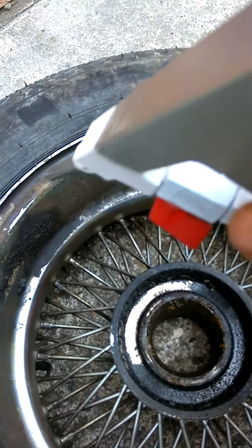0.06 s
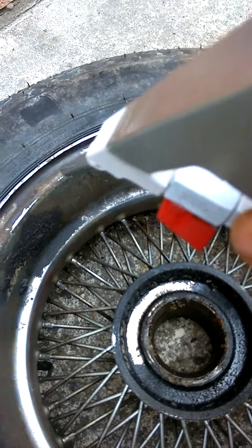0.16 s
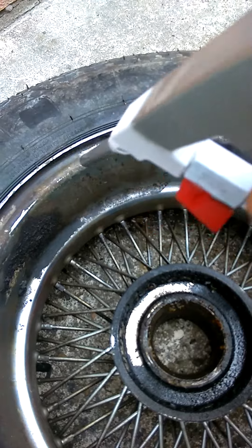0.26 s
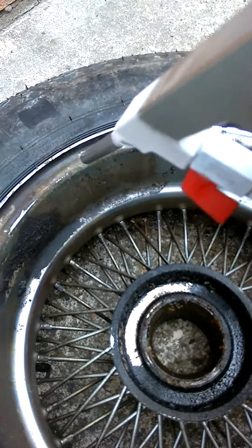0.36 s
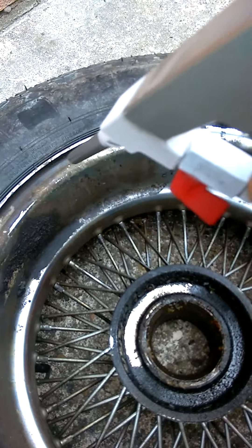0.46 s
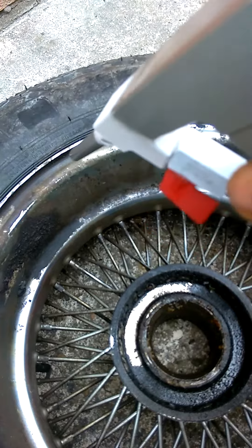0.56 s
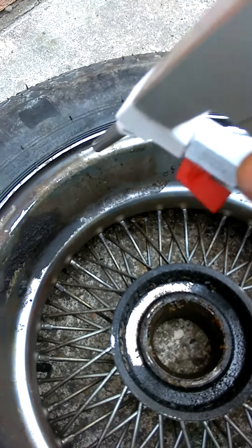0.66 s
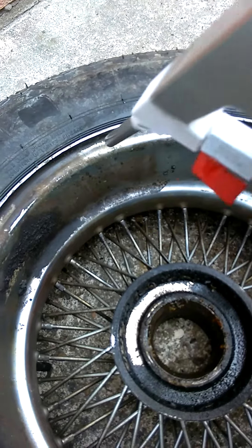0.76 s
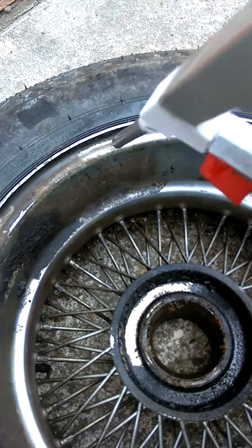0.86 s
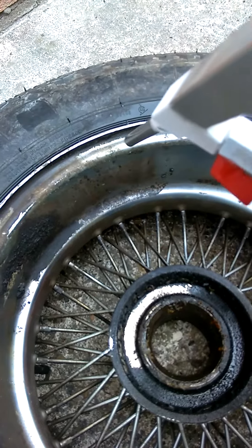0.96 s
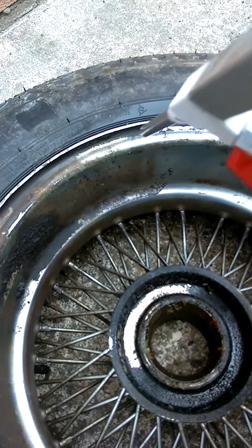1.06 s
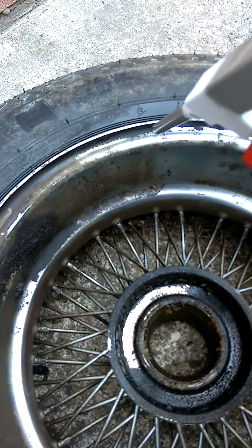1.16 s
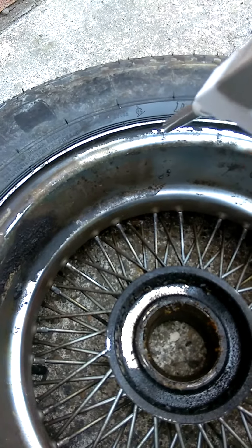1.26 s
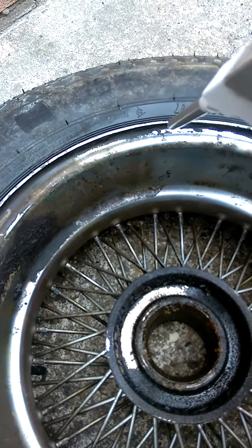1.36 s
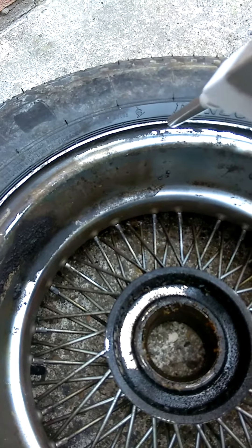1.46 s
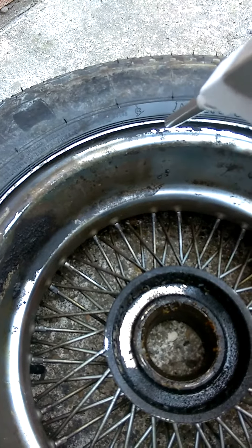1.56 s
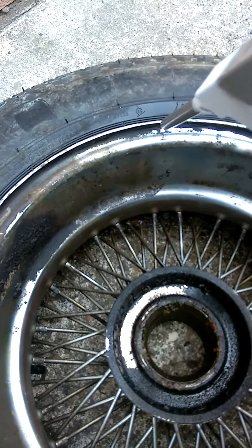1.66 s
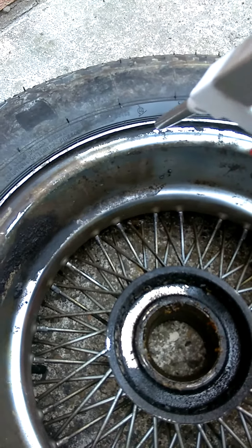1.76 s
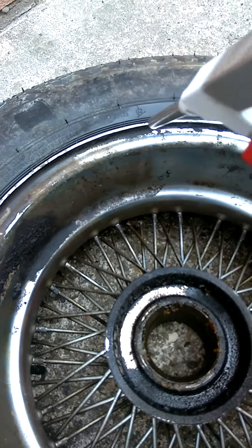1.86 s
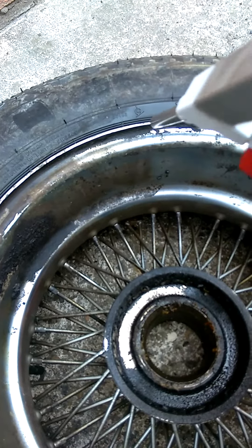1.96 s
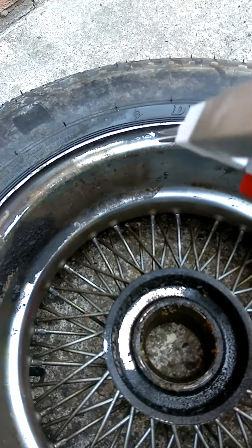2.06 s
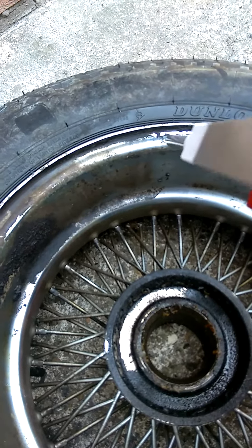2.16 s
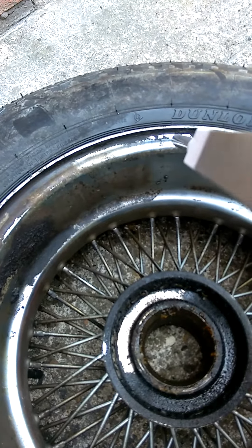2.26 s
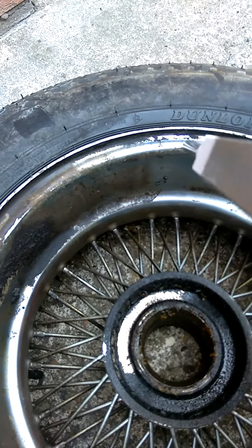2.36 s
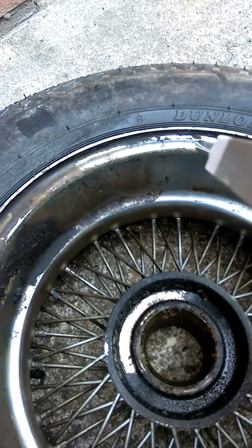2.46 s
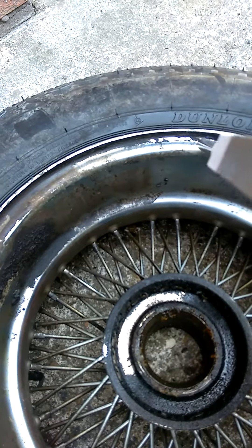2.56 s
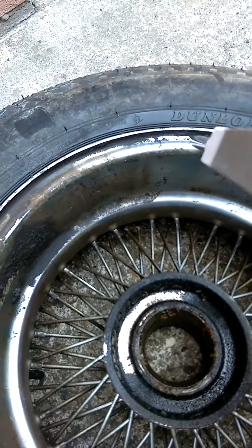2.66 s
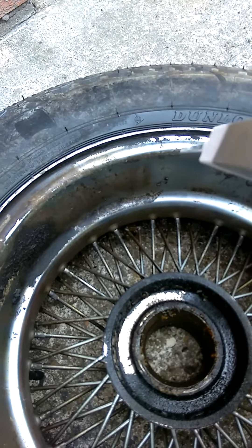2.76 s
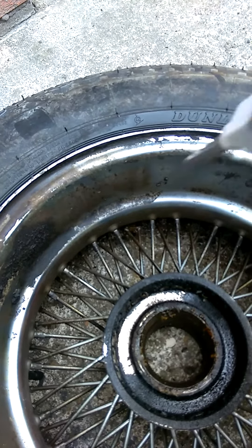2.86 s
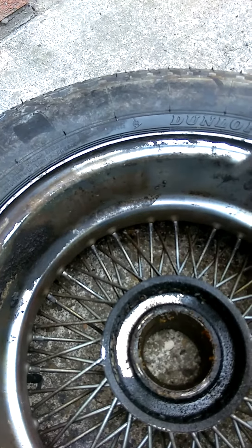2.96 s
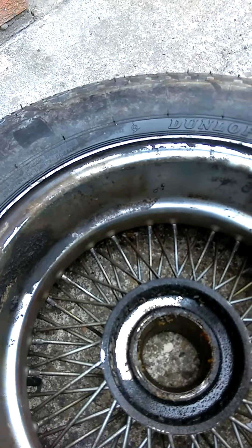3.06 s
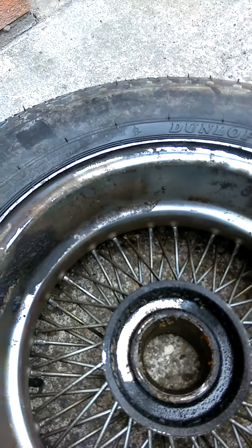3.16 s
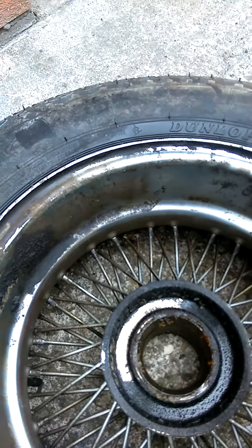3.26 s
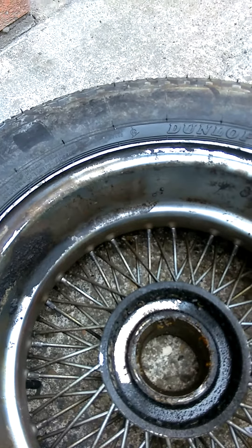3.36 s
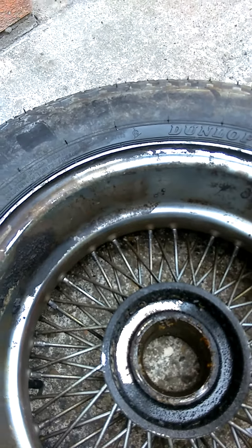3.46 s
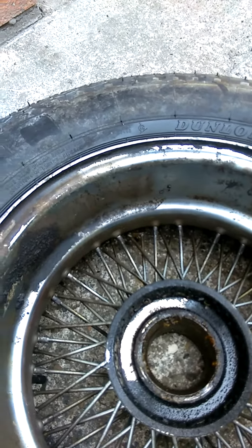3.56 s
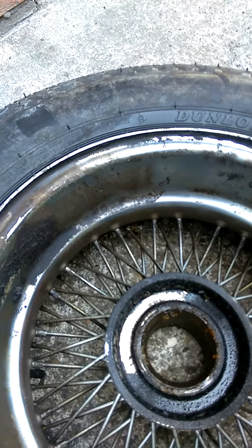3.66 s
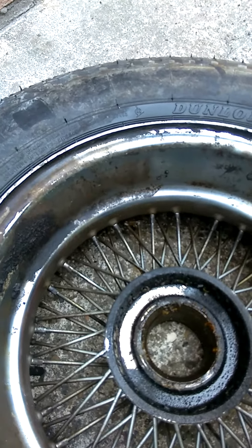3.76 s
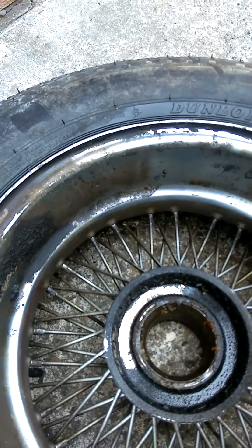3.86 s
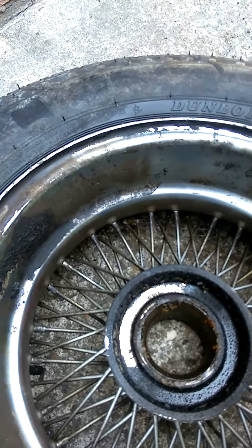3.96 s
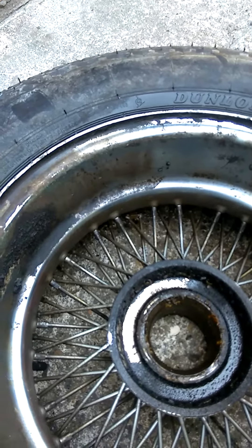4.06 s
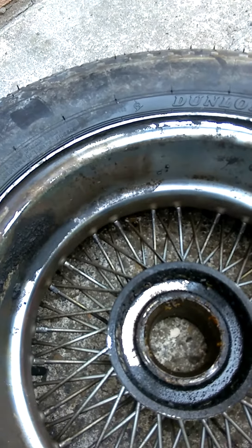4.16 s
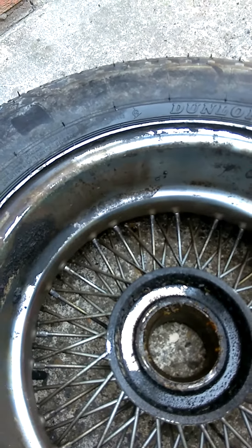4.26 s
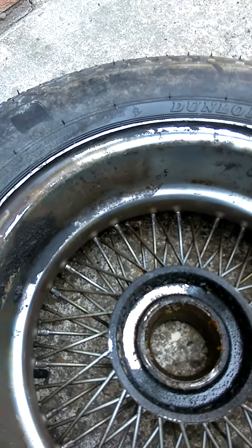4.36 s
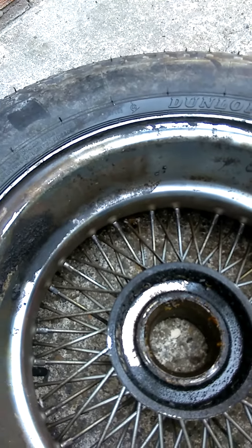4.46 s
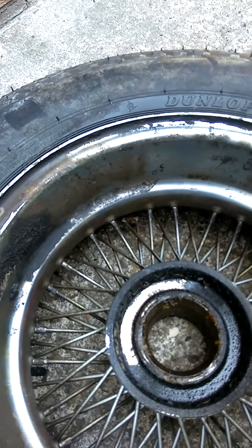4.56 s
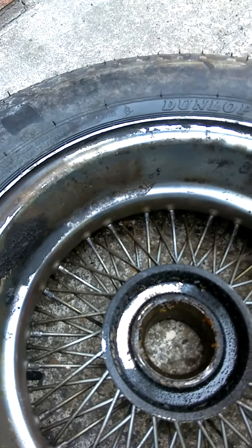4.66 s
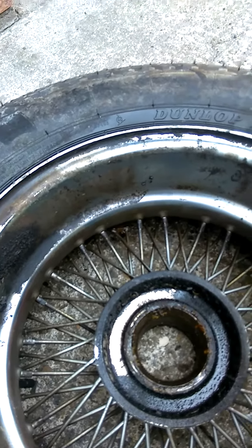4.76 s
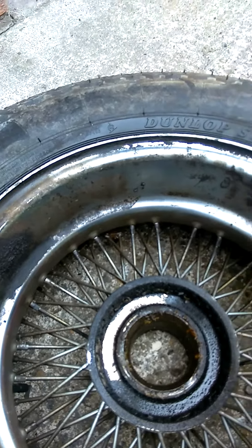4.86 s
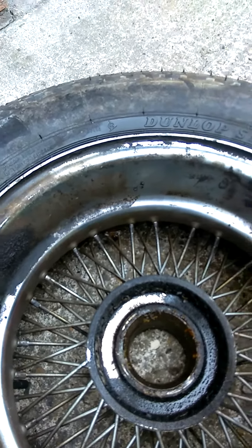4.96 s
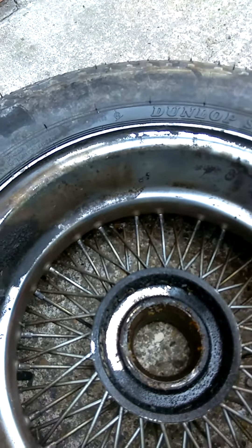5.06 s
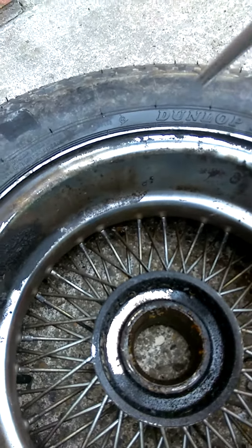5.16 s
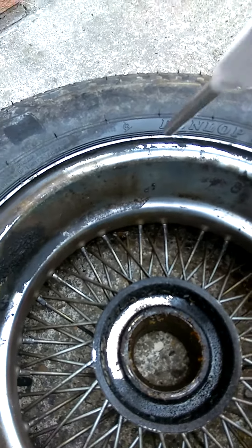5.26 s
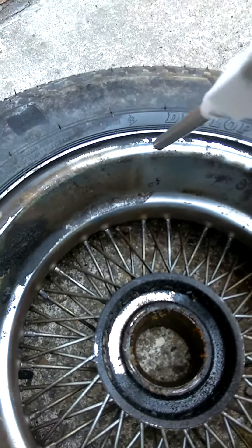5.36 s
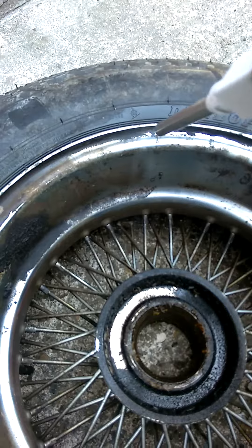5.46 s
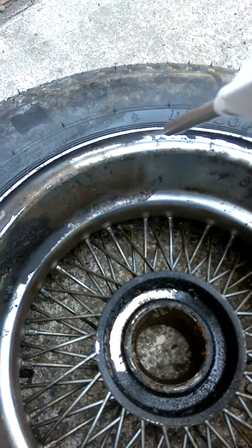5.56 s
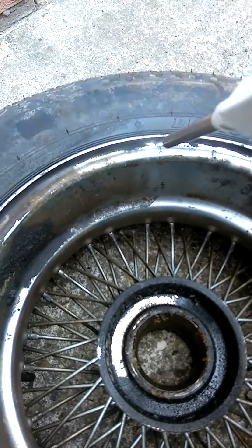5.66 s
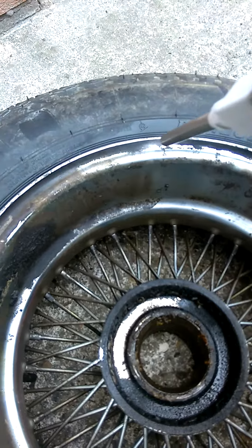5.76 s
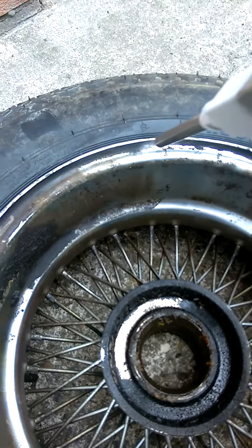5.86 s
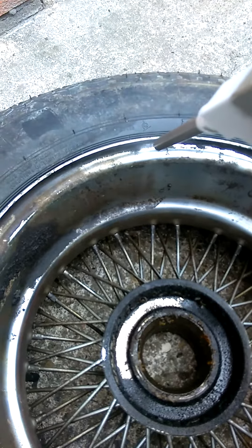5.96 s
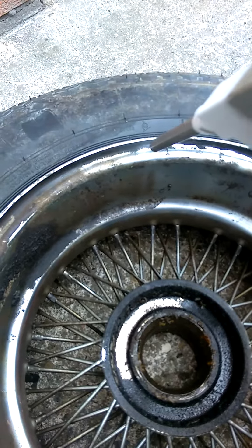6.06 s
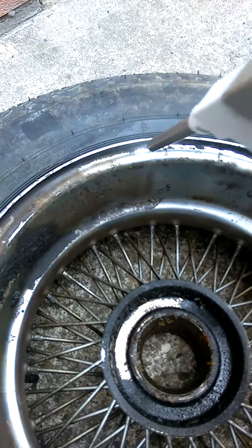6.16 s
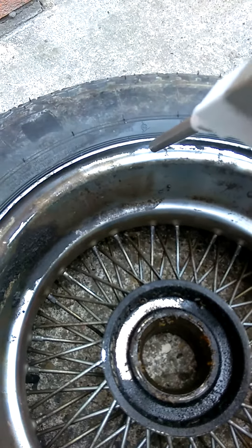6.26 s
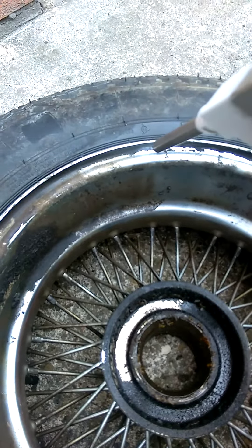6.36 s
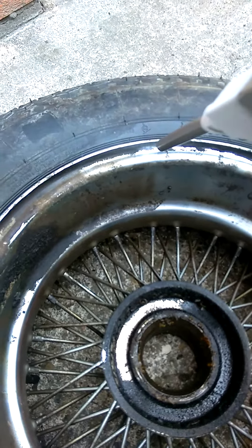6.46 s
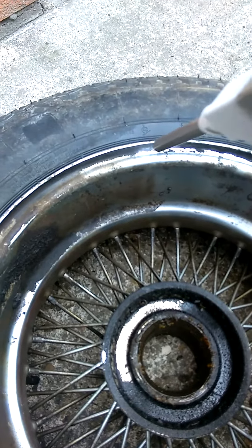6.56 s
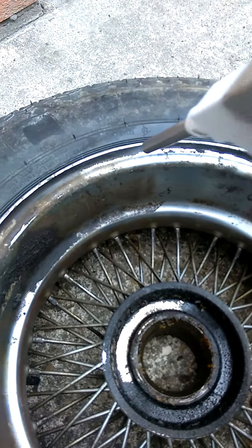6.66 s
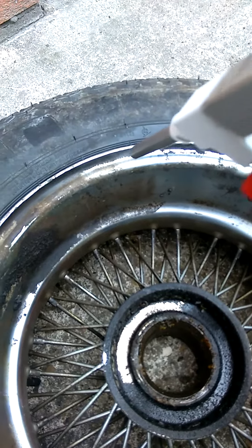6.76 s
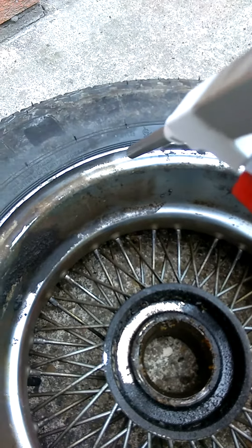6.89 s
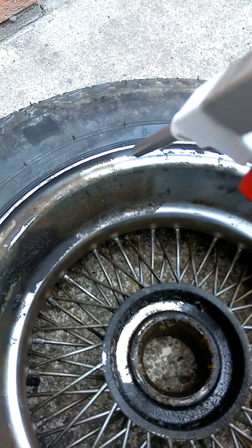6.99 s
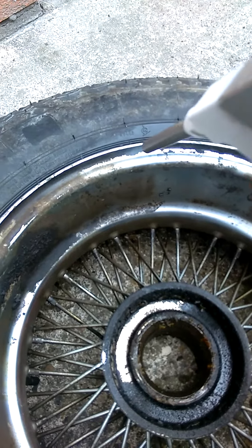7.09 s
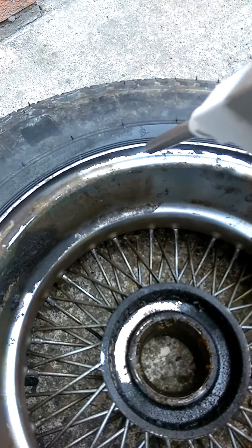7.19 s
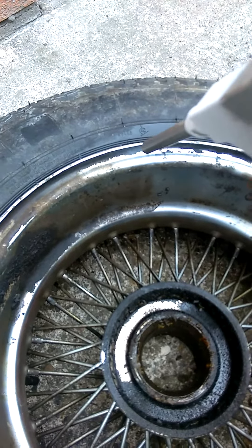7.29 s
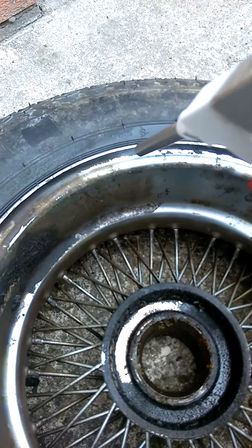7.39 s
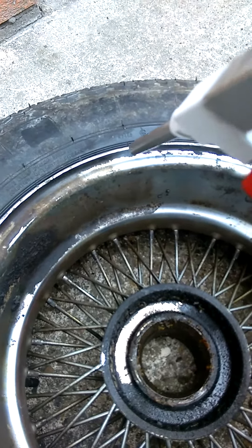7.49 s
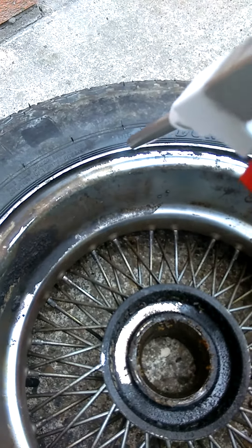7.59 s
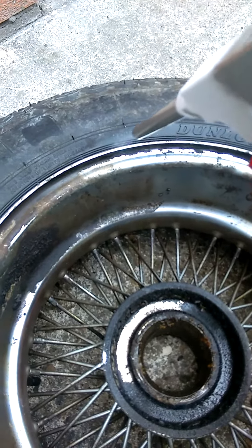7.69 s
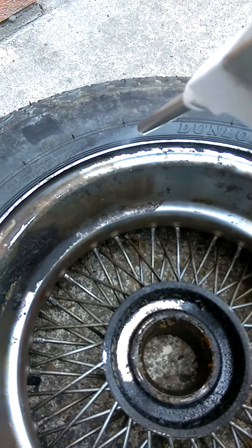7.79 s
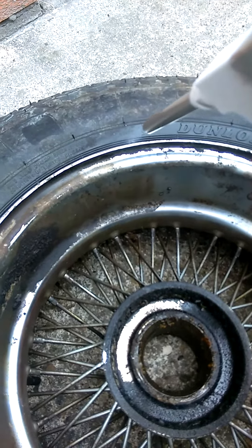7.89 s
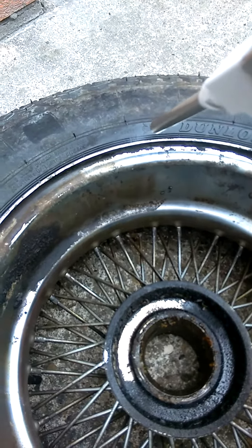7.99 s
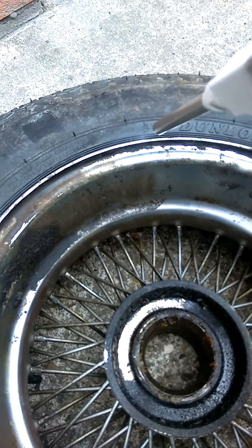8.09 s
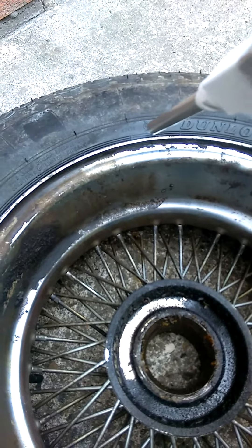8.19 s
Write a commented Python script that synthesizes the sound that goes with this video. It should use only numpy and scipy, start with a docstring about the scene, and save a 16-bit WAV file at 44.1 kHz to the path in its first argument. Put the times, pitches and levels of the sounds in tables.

```python
"""A nozzle jets air and ice pellets at a metal wheel rim, stops, puffs loosely once and blows again.
The jet is noise with sparse strikes, coloured by the rim; it reaches the right port first.
Behind it a motor throbs at about 30 turns/s as a sum of harmonics and ticks once a turn at each port.
It drives a slower piston pump, heard as ringing strokes. Throb and pump have opposite port polarity.
Around them: a noisy rumble, a rattling casing, faint lumpy low noise, low bumps and short spits of air."""
import sys
import numpy as np
from scipy import signal
from scipy.io import wavfile
from scipy.ndimage import uniform_filter1d

SR = 44100
rng = np.random.default_rng(int(sys.argv[2]) if len(sys.argv) > 2 else 0)


def transcribe(u):
    """Save the signal u as a 16-bit wav file named by the first command-line argument.

    u: samples, shape (n,) or (channels, n), limited to [-1, 1]; the rate is SR.
    q: integer samples, one column per channel.
    """
    v = np.clip(np.atleast_2d(u).T, -1, 1)
    q = np.round(v * 32767).astype(np.int16)
    wavfile.write(sys.argv[1], SR, q)


N = 362943

# Levels are relative unless said otherwise.
# Aim along the rim, one list a blast:
# (time [s], jet level [dB], extra rim roar [dB], extra nozzle sizzle [dB], shift to left [dB])
BLAST_AIMS = [
    [(0.0, -20.5, 2, 4.5, 0), (0.55, -20, 1, 5, 0), (0.95, -19, -3, 2.5, 2), (1.3, -20.5, -0.5, 5.5, 1.5),
     (1.8, -19.5, 2, 3.5, 1), (2.15, -18, -2, 2.5, 1.5), (2.5, -18.5, -5.5, 1, 1.5),
     (3.0, -18, 2.5, 3, 0.5)],
    [(5.288, -19.5, -0.5, 0, -3.5), (5.7, -18, 2.5, 0, -1.5), (6.0, -20, 2.5, 2.5, -1),
     (6.4, -19.5, 3.5, 1, -1), (6.9, -20, 7.5, 2, -2.5), (7.45, -21.5, 10.5, 4, -1.5),
     (7.7, -19, 5, 1.5, -2.5), (7.95, -20.5, 6.5, 1.5, -2.5), (8.23, -18, 0, -0.5, -1)],
]
# Loose puff with a weaker second push: same columns
PUFF_AIM = [(4.72, -54, 8, -2, 6.5), (4.76, -38, 8, -2, 6.5), (4.79, -35, 8, -2, 6.5),
            (4.815, -24.5, 4, -1, 6.5), (4.83, -22, -2, -2, 8), (4.855, -18.5, -1, -1.5, 4),
            (4.88, -20, -7, 4.5, 5), (4.904, -21, -1, 2, 8), (4.91, -25, -6, 0, 3),
            (4.925, -27.5, -8, 0, 6), (4.948, -23.5, -6, -3, 3), (4.963, -22.5, -2, -5, 2),
            (4.972, -25, 6, -3, 6), (5.0, -35, 11, -4, 4), (5.04, -41, 12, -6, 5)]
# Valve, one row a blast: (opens [s], shuts [s])
VALVE_TIMES = [(-1, 2.922), (5.288, 9)]
# Hand shake of the aim: (level [dB], roar [dB], sizzle [dB], shift to left [dB])
HAND_SHAKE_DB = (0.43, 0.42, 0.61, 0.23)
# Brief dips of the jet: (time [s], depth [dB])
JET_DIPS = [(0.22, -2.5), (0.41, 0), (0.52, -4), (1.01, -0.5), (1.09, -1.5), (1.74, -2), (2.07, -2),
            (5.79, -2.5), (6.47, -4), (6.59, -2.5)]
# Jet on the rim: (frequency [Hz], left density [dB], right density [dB])
RIM_JET_COLOUR = [(60, -44, -44), (280, -7.5, -6), (530, -16, -9), (806, 0.5, -4), (1000, -8.5, -2.5),
                  (1210, -0.6, -2), (1776, 4, -0.5), (2645, 9, 13.5), (4100, 0, 7), (5400, 1.5, 9),
                  (5500, 8.5, 5), (7200, 4, 7), (10200, 4, 6.5), (12700, 5.5, 8), (15400, 2, 4),
                  (15900, -11, 8.5)]
# Jet aimed away from the wheel: same columns
FREE_JET_COLOUR = [(600, -17, -21), (1500, -7, 0.5), (2740, -8, 1), (4160, -8.5, 1.5), (8000, -3.5, 0),
                   (10300, -7, 1.5), (13700, 3.5, 8), (15600, -2, -5)]
# Hollows of rim and tyre: (centre [Hz], width [Hz], first blast left [dB], right [dB],
# second blast left [dB], right [dB])
RIM_HOLLOWS = [(1060, 76, -4.5, 2.5, -0.5, -0.5), (1430, 225, 1.5, 7.5, 6.5, 8), (1850, 250, 2.5, 3, 2, 1),
               (2120, 110, 3.5, 6, 7.5, 4), (2423, 146, -1.5, 4.5, -1, 5.5),
               (2930, 350, -3, 0.5, 6.5, -2.5), (3290, 106, 6, 2, 7, 6), (3450, 97, 0, -2.5, -4, -8),
               (3670, 110, 4.5, 6, 2, 2.5), (4050, 230, -2, 4, 0, 6), (5270, 380, -0.5, -1.5, 1, -3.5),
               (4370, 400, 1.5, 1, 4.5, 0.5), (5560, 200, 4, 5.5, 4, -1), (5790, 170, -5, -3, -5.5, -4),
               (6270, 180, -6, 5.5, -6, 2), (7700, 250, 0, 1, 3.5, 1.5), (8500, 300, 1.5, 0.5, 6, -0.5),
               (9380, 160, -0.5, 9, -4, 12), (9420, 330, -0.5, -5.5, -3, -6),
               (10400, 300, -2.5, 4, 1, -0.5), (11130, 320, 2.5, -5, 2, -5.5), (11900, 300, -2, 1, -1, 3),
               (13160, 330, 0, 5, 3, -2)]
# Hollows of the nozzle: (centre [Hz], width [Hz], left [dB], right [dB])
NOZZLE_HOLLOWS = [(2690, 230, 10, 6), (3780, 200, 4, 0), (4970, 500, -6, -2), (7300, 900, 1.5, 2),
                  (12300, 400, 3, 2), (14000, 600, 2, 0)]
# Treble thinning as the trigger is let go: (centre [Hz], width [Hz], gain [dB])
EASE_TREBLE_DIP = (6000, 1500, -4)
# Spits of the idle nozzle: (time [s], length [s], left [dB], right [dB])
SPIT_EVENTS = [(3.892, 0.0093, -29, -31), (4.151, .005, -27, -32)]
# Spit colour: (centre [Hz], width [Hz], level [dB])
SPIT_MODES = [(13500, 3500, -2), (8500, 3000, -8)]
# Motor speed: (time [s], rate [turns/s])
MOTOR_SPEED = [(0.0, 29.8), (0.3, 29.8), (0.9, 29.843), (1.5, 29.943), (2.1, 29.938), (2.7, 30.057),
               (3.3, 30.037), (3.9, 30.089), (4.5, 29.927), (5.1, 30.015), (5.7, 29.797), (6.3, 29.998),
               (6.9, 29.922), (7.5, 29.63), (8.02, 29.692), (8.23, 29.692)]
# Throb: (multiple of turning rate, left [dB], right [dB], right port lead before inversion [rad])
THROB_HARMONICS = [(1, -50.7, -49.1, -0.07), (2, -32.6, -31.9, -0.13), (3, -31.1, -30.4, -0.18),
                   (4, -40.1, -37.7, -0.11), (5, -36.2, -38.6, -0.73), (6, -28.4, -31.5, -0.08),
                   (7, -31.2, -33.8, -0.07), (8, -38.5, -38.3, 0.07), (9, -27.6, -28.6, 0.05),
                   (10, -50.7, -41.3, 0.09), (11, -49.5, -49.3, -1.41), (12, -42.3, -44.5, -0.75),
                   (13, -47.0, -44.9, -1.14), (15, -44, -40.7, 1.0), (18, -44.8, -40.8, 0.03),
                   (19, -51.6, -44.5, -0.77), (22, -43.5, -51.7, -0.81), (42, -47, -56, 0)]
# Pump cylinder and pipe, each rung twice: (centre [Hz], width of one pass [Hz], level [dB])
PUMP_MODES = [(209.6, 27, 11.5), (345, 54, 3), (387, 65, -2.5), (511, 42, 2.5), (560.3, 40, 4),
              (607, 15, 5), (653, 53, 0), (792, 67, -1), (924, 190, -5.5), (1253, 26, 1)]
# Loose part; only the first two modes ring with the knock: (centre [Hz], width [Hz], level [dB])
TICK_MODES = [(1730, 90, 0), (1950, 80, -2), (2430, 120, -12), (3650, 300, -10), (11000, 7000, -18)]
# How hard the loose part lands: (time [s], force [dB])
TICK_FORCE_DB = [(0, -3), (3.0, -2), (3.2, -1), (3.32, 1), (3.62, 1.0), (3.75, -3), (3.9, -4), (4.1, -1),
                 (4.2, -4), (4.4, -1), (4.6, -1), (4.75, -0.5), (5.25, -0.5), (8.23, -9)]
# Machine rumble: (frequency [Hz], density [dB])
RUMBLE_COLOUR = [(20, -30), (45, -23), (80, -7), (150, 12), (240, -7.5), (285, 5), (340, -7.5), (420, 4.5),
                 (470, -3), (540, -3), (700, -8.5), (950, -1), (1800, -5), (3200, -7), (5000, -16.5),
                 (13400, -20), (15700, -29)]
# Left-right likeness of the rumble: (frequency [Hz], correlation)
RUMBLE_LIKENESS = [(60, -1.8), (150, -0.79), (250, -0.96), (340, 0.44), (470, -1.48), (600, 0.5),
                   (950, -0.53), (2380, 0.15), (5980, -0.099), (15000, -0.1)]
# Side of pump and rumble: (frequency [Hz], added left minus right [dB])
MACHINE_BALANCE = [(60, 0), (120, -3.5), (240, 1.5), (480, -5.5), (950, 1), (1890, 1.5), (3770, -0.5),
                   (7520, 12.5), (15000, 17.5)]
# Casing rattle bouts: (start [s], length [s], level [dB], pitch [Hz])
RATTLE_BOUTS = [(3.924, 0.077, 5, 2600), (4.002, 0.084, 4, 2190), (4.198, 0.16, 7, 2080),
                (4.498, 0.16, 5.5, 2000)]
# Rattling parts of the casing: (multiple of pitch, width [Hz], level [dB])
CASING_MODES = [(1, 240, 6), (1.32, 400, -1), (3.9, 4260, -12)]
# Sinking of the machine under each blast: (first [dB], second [dB])
SINK_UNDER_JET_DB = (-6, -3)
# Further sinks as air sets in: (time [s], depth [dB], recovery [s])
MACHINE_SINKS = [(4.9, -10.5, 0.11), (5.33, -11.5, 1.3)]
# Low bumps of air or handling at the ports:
# (time [s], left peak [dB], right peak [dB], pitch [Hz], length [s], right port polarity)
PORT_BUMPS = [(0.416, -44, -35, 85, 0.018, 1), (0.46, -42, -43, 75, .02, 1), (.545, -39, -29, 102, 0.01, 1),
              (.6, -43, -37, 70, 0.023, 1), (0.7, -45, -51, 65, .03, 1),
              (3.831, -9.5, -9.5, 170, 0.0045, -1), (3.893, -10, -11.5, 280, 0.0049, -1),
              (5.368, -23, -38, 97, 0.0051, 1), (5.464, -40, -39, 70, 0.0074, 1),
              (5.503, -43, -20, 80, 0.0015, 1), (5.558, -50, -46, 70, .012, 1)]

OPEN_S, POP_DB, POP_S = 0.0022, 16, 0.025  # valve opening: fast rise and a short low pop
EASE_S, EASE_SIZZLE_DB, EASE_SAG_DB_PER_S = 0.092, 1, 3  # trigger being let go
EASE_LOW_DB, EASE_LOW_HZ = 8.5, 1150  # low rush meanwhile
SHUT_DB_PER_S = 404  # hose empties
DIP_FALL_S, DIP_BACK_S = 0.0036, 0.042
STRIKES_PER_S, STRIKE_STEP_DB, STRIKE_SHARE = 2500, 11.0, 0.093
BOUNCE_SHARE, BOUNCE_WANDER_MS = (0.66, 0.23), 0.018  # share: left, right
STROKE_KNOCK, STROKE_HISS = 26.0, 0.33
TICK_KNOCK, TICK_HISS = 0.14, 0.5
RATTLE_REST_DB, RATTLE_REST_HZ, RATTLE_EDGE_S, RATTLE_BEAT_DB = -11.5, 2280, 0.023, 2.5
LOW_NOISE_DB, LOW_NOISE_HZ, LOW_NOISE_SWELL_DB = -34, 100, 6  # below the machine's level
MACHINE_DB, SETTLE_S, SINK_FALL_S = -24, 0.082, 0.024
EDGE_HZ = 15740
HZ = np.fft.rfftfreq(1024, 1 / SR)[:, None]


def gain_of(db):
    """Decibels to gain."""
    return 10 ** (np.asarray(db) / 20)


def evened(x):
    """Scales to rms 1."""
    return x / np.sqrt(np.mean(abs(x) ** 2) + 1e-20)


def read(points, hz):
    """Reads a spectrum table on a log-frequency axis."""
    f, value = np.transpose(points)
    return np.interp(np.log(hz + 1), np.log(f + 1), value)


def drift(shape, size):
    """Smooth noise of rms 1: white noise box-averaged twice along each axis."""
    x = rng.standard_normal(shape)
    for axis, n in enumerate(size):
        x = uniform_filter1d(uniform_filter1d(x, n, axis), n, axis)
    return evened(x)


def spectra(x):
    """Short-time spectra."""
    return signal.stft(x, nperseg=1024, noverlap=768)[2]


def waves(z, count):
    """Back from short-time spectra."""
    return signal.istft(z, nperseg=1024, noverlap=768)[1][..., :count]


def ring(x, modes):
    """Sum of two-pole resonances."""
    return sum(gain_of(db) * signal.lfilter(*signal.iirpeak(hz, hz / width, SR), x)
               for hz, width, db in modes)


def hump(centre_hz, width_hz):
    """Resonance-shaped bump over frequency, peak 1."""
    return 1 / (1 + (2 * (HZ - centre_hz) / width_hz) ** 2)


def dent(t, s, fall_s, back_s):
    """Lopsided bell that reaches 1 at time s."""
    return np.where(t < s, np.exp(-((t - s) / fall_s) ** 2), np.exp(-((t - s) / back_s) ** 2))


def pellet_jet(count):
    """Spectra of turbulent air with random pellet strikes under an uneven feed: shared, left, right."""
    sizes = gain_of(STRIKE_STEP_DB * np.minimum(rng.exponential(1, (3, count)), 5))
    strikes = sizes * (rng.random((3, count)) < STRIKES_PER_S / SR)
    turbulence = rng.standard_normal((3, count))
    feed = gain_of(0.69 * drift(count, size=[500]) + 0.11 * drift(count, size=[60]))
    return spectra(feed * turbulence * (1 + STRIKE_SHARE * evened(strikes)))


def at_ports(shared, left, right, lag_ms, bounce_ms):
    """Direct path, late at the left port, plus one bounce per port; the hand makes the bounces wander."""
    treble = 1 / (1 + (3500 / (HZ + 1)) ** 4)  # short waves bounce and scatter
    wander = drift((4, shared.shape[1]), size=[1, 60])
    bounces = []
    for ms, share, delay, strength in zip(bounce_ms, BOUNCE_SHARE, wander[:2], wander[2:]):
        delay_s = (ms + BOUNCE_WANDER_MS * delay) / 1000
        bounces.append(np.exp(-2j * np.pi * HZ * delay_s) * treble * (share + 0.2 * strength))
    lag = np.exp(-1j * (2 * np.pi * HZ * lag_ms / 1000 + 2.2))
    same = 0.85 - 0.17 * treble
    apart = np.sqrt(1 - same ** 2)
    return np.array([same * lag * shared * (1 + bounces[0]) + apart * left,
                     same * shared * (1 + bounces[1]) + apart * right])


def jet(rows, colour, lag_ms, bounce_ms, hollows):
    """Jet noise at both ports, filtered by its colour, hollows and moving aim: start sample, sound."""
    s, level_db, roar_db, sizzle_db, pan_db, eased = np.transpose(rows)
    t = np.arange(s[0], s[-1], 1 / SR)
    z = at_ports(*pellet_jet(len(t)), lag_ms, bounce_ms)
    frame_s = s[0] + np.arange(z.shape[-1]) * 256 / SR

    hz, *ports = np.transpose(colour)
    tone_db = np.array([read(np.transpose([hz, port]), HZ) for port in ports])
    # the level refers to 2500-8000 Hz
    band = np.sqrt(np.mean(gain_of(2 * tone_db) * (HZ > 2500) * (HZ < 8000)))

    low, high = 1 / (1 + (HZ / 2300) ** 6), 1 / (1 + (8500 / (HZ + 1)) ** 8)
    moving_db = low * np.interp(frame_s, s, roar_db) + high * np.interp(frame_s, s, sizzle_db)
    eased = np.interp(frame_s, s, eased)
    moving_db = moving_db + EASE_LOW_DB * eased / (1 + (HZ / EASE_LOW_HZ) ** 6)
    dip_hz, dip_width_hz, dip_db = EASE_TREBLE_DIP
    moving_db = moving_db + dip_db * eased * hump(dip_hz, dip_width_hz)
    hollow_db = np.array([sum(mode[2 + port] * hump(mode[0], mode[1]) for mode in hollows)
                          for port in range(2)])
    hollow_db = (1 - eased) * hollow_db  # easing leaves the hollows

    treble = 1 / (1 + (3500 / (HZ + 1)) ** 4)
    patches = (2, 513, len(frame_s))
    lasting_db = (0.74 + 1.74 * treble) * drift(patches, size=[1, 2, 50])
    fleeting_db = 2.21 * drift(patches, size=[1, 3, 6])
    z = z * gain_of(tone_db + moving_db + hollow_db + lasting_db + fleeting_db)

    half_pan_db = np.interp(t, s, pan_db) / 2
    port_db = np.interp(t, s, level_db) + [half_pan_db, -half_pan_db] - 0.5
    return round(s[0] * SR), waves(z, count=len(t)) / band * gain_of(port_db)


def aim_and_valve(rows, opens, shuts):
    """Aim rows every 1 ms, shaken by the hand and shaped by the valve; last column flags easing."""
    s, *columns = np.transpose(rows)
    t = np.arange(s[0], s[-1], 0.001)
    shake = np.array(HAND_SHAKE_DB)[:, None] * drift((4, len(t)), size=[1, 70])
    level_db, roar_db, sizzle_db, pan_db = np.array([np.interp(t, s, c) for c in columns]) + shake
    pop = np.exp(-(t - opens) / POP_S)
    eased = t > shuts - EASE_S
    level_db = level_db + sum(db * dent(t, at, DIP_FALL_S, DIP_BACK_S) for at, db in JET_DIPS)
    level_db = level_db - EASE_SAG_DB_PER_S * np.maximum(t - shuts + EASE_S, 0)
    level_db = level_db - 35 * np.clip(1 - (t - opens) / OPEN_S, 0, 1)
    level_db = level_db - SHUT_DB_PER_S * np.maximum(t - shuts, 0)
    return np.transpose([t, level_db, roar_db + POP_DB * pop,
                         sizzle_db + EASE_SIZZLE_DB * eased, pan_db, eased])


def blasts():
    """Two blasts on the rim, each through its own hollows."""
    hollows = np.array(RIM_HOLLOWS)
    seen = ([0, 1, 2, 3], [0, 1, 4, 5])
    return [jet(aim_and_valve(rows, *valve), RIM_JET_COLOUR, 0.414, (1.718, 1.15), hollows[:, columns])
            for rows, valve, columns in zip(BLAST_AIMS, VALVE_TIMES, seen)]


def puff():
    """Loose puff aimed away from the wheel."""
    rows = [row + (0,) for row in PUFF_AIM]  # never eased
    return jet(rows, FREE_JET_COLOUR, 0.168, (1.3, 0.9), NOZZLE_HOLLOWS)


def spits():
    """Leftover air as short bright noise under bell-shaped swells."""
    t = np.arange(N) / SR
    shape = sum(gain_of([[left], [right]]) * np.exp(-((t - s) / length) ** 2)
                for s, length, left, right in SPIT_EVENTS)
    return shape * evened(ring(rng.standard_normal((2, N)), SPIT_MODES))


def motor_throb(turns):
    """Wavering harmonics of the turning rate, opposite in polarity at the ports."""
    waver_db = 0.33 * drift((len(THROB_HARMONICS), N // 64 + 1), size=[1, 50])
    waver = gain_of(waver_db).repeat(64, axis=1)[:, :N]
    throb = 0
    for (k, left_db, right_db, lead), w in zip(THROB_HARMONICS, waver):
        sweep = 2 * np.pi * (0.19 * k + 0.042 * k * k) + 1.93  # higher multiples come earlier in the turn
        phase = 2 * np.pi * k * turns + sweep + [[0], [lead]]
        throb = throb + gain_of([[left_db], [right_db]]) * w * np.cos(phase)
    return evened(throb * [[1], [-1]]) * gain_of(1.2)


def pump_spectra(turns):
    """Belt-slowed strokes, a knock and decaying noise, ring cylinder and pipe; right port inverted, early."""
    strokes = (0.56 * turns + 0.55) % 1
    hiss = STROKE_HISS * rng.standard_normal(N) * (0.15 + np.exp(-strokes / 0.22))
    burst = hiss + STROKE_KNOCK * (np.diff(strokes, prepend=0) < 0)
    rung = 0
    for hz, width, db in PUMP_MODES:
        mode = [(hz, width, 0)]
        rung = rung + gain_of(db) * ring(ring(burst, mode), mode)
    pump = spectra(evened(rung))
    return gain_of(-7.5) * np.array([pump, -pump * np.exp(2j * np.pi * HZ * 0.23 / 1000)])


def rumble_spectra():
    """Coloured noise whose left-right correlation varies with frequency."""
    a, b = spectra(rng.standard_normal((2, N))) * evened(gain_of(read(RUMBLE_COLOUR, HZ)))
    same = np.clip(read(RUMBLE_LIKENESS, HZ), -1, 1)
    return gain_of(-4.5) * np.array([a, same * a + np.sqrt(1 - same ** 2) * b])


def tick(t, turns):
    """A loose part lands once a turn per port: a knock of random sign and a noise burst ring its modes."""
    since = (turns - [[0.33], [0.5]]) % 1
    each_turn_db = 1.0 * rng.standard_normal(round(turns[-1]) + 2)
    force_db = each_turn_db[(turns + 0.67).astype(int)] + np.interp(t, *np.transpose(TICK_FORCE_DB))
    force = gain_of(force_db)
    hiss = rng.standard_normal((2, N)) * since * np.exp(-since / 0.035)
    knock = (np.diff(since, prepend=0) < 0) * np.sign(rng.standard_normal(N))
    rung = ring(TICK_HISS * hiss * force, TICK_MODES) + ring(TICK_KNOCK * knock * force, TICK_MODES[:2])
    return gain_of([[-10], [-14.5]]) * evened(rung)  # nearer the left port


def rattle(t, turns):
    """Casing noise beating with the motor: a steady rattle and soft-edged bouts at their own pitch."""
    noise = rng.standard_normal((2, N)) * gain_of(RATTLE_BEAT_DB * np.cos(2 * np.pi * (turns - 0.42)))

    def casing(pitch_hz):
        return evened(ring(noise, [(k * pitch_hz, width, db) for k, width, db in CASING_MODES]))

    out = gain_of(RATTLE_REST_DB) * casing(RATTLE_REST_HZ)
    for s, length, db, hz in RATTLE_BOUTS:
        edges = np.clip(np.minimum(t - s, s + length - t) / RATTLE_EDGE_S + 0.5, 0, 1)
        out = out + gain_of(db) * edges * casing(hz)
    return gain_of(-12.5) * out


def low_noise():
    """Uneven low-passed noise, unrelated between the ports."""
    lowpass = signal.butter(4, LOW_NOISE_HZ, fs=SR, output="sos")
    low = signal.sosfilt(lowpass, rng.standard_normal((2, N)))
    return evened(low) * gain_of(LOW_NOISE_DB + LOW_NOISE_SWELL_DB * drift(N, size=[2500]))


def machine_level_db(t):
    """Machine level: lower while air flows."""
    under = sum(db * (t > opens) * np.exp(-np.maximum(t - shuts, 0) / SETTLE_S)
                for (opens, shuts), db in zip(VALVE_TIMES, SINK_UNDER_JET_DB))
    sinks = sum(db * dent(t, s, SINK_FALL_S, back_s) for s, db, back_s in MACHINE_SINKS)
    return MACHINE_DB + uniform_filter1d(under, size=1000) + sinks


def machine():
    """Throb, pump, tick and rattle follow one motor's turns; free rumble and low noise sink with them."""
    t = np.arange(N) / SR
    turns = np.cumsum(np.interp(t, *np.transpose(MOTOR_SPEED))) / SR
    half_side_db = read(MACHINE_BALANCE, HZ) / 2
    balance = gain_of([half_side_db, -half_side_db])
    low = waves((pump_spectra(turns) + rumble_spectra()) * balance, count=N)
    mix = motor_throb(turns) + low + tick(t, turns) + low_noise() + rattle(t, turns)
    return mix * gain_of(machine_level_db(t))


def bumps():
    """Low pressure waves under bell-shaped swells."""
    t, out = np.arange(N) / SR, np.zeros((2, N))
    for s, left_db, right_db, hz, length, polarity in PORT_BUMPS:
        near = slice(round((s - 4 * length) * SR), round((s + 4 * length) * SR))
        since = t[near] - s
        swell = np.exp(-(since / length) ** 2) * np.cos(2 * np.pi * hz * since)
        out[:, near] += np.outer([gain_of(left_db), np.sign(polarity) * gain_of(right_db)], swell)
    return out


def scene():
    """Jet in front, machine behind."""
    out = machine() + bumps()
    for start, sound in blasts() + [puff()]:
        part = out[:, start:start + sound.shape[1]]
        part += sound[:, :part.shape[1]]
    return out + spits()


def record(dry):
    """Flattens the highest peaks softly, then limits the band."""
    held = 1.3 * np.tanh(dry / 1.3)
    lowpass = signal.firwin(2047, EDGE_HZ, window=("kaiser", 9), fs=SR)
    return signal.oaconvolve(held, lowpass[None], "same")


dry = scene()
out = record(dry)
transcribe(out)
```